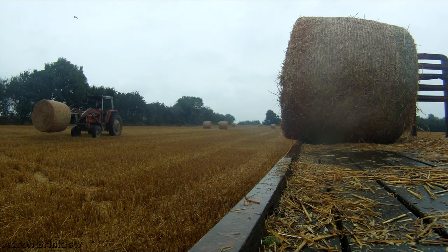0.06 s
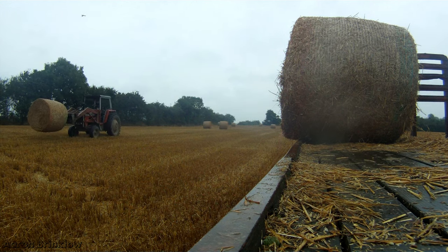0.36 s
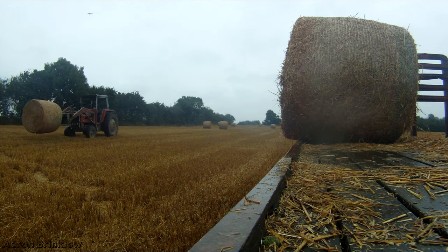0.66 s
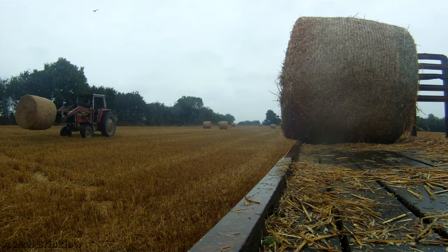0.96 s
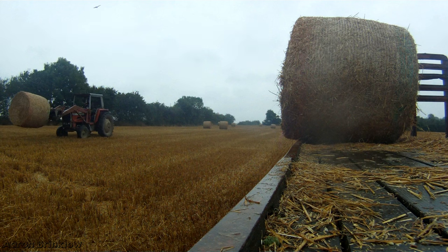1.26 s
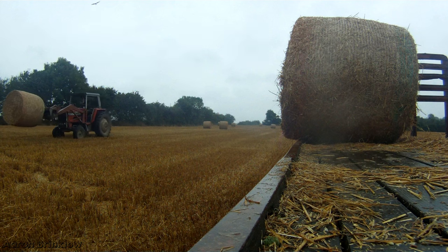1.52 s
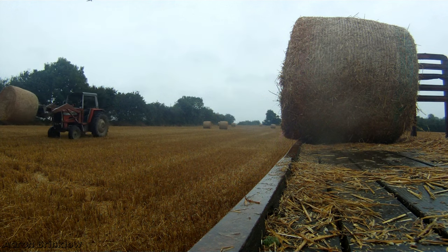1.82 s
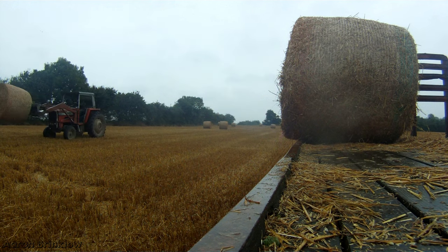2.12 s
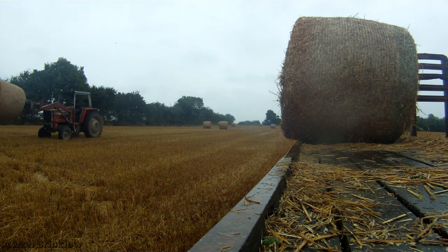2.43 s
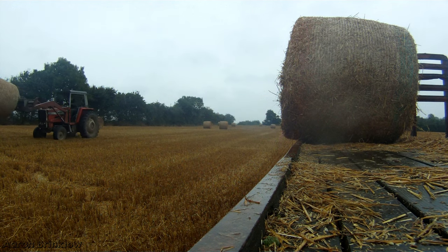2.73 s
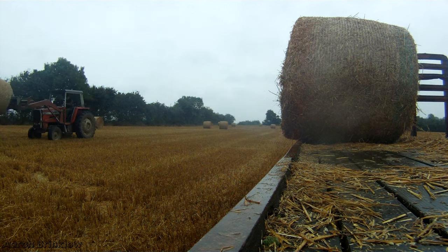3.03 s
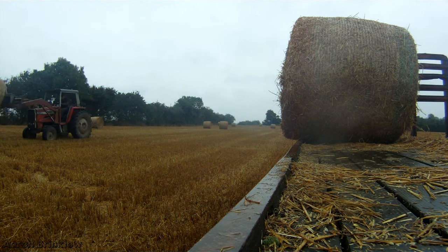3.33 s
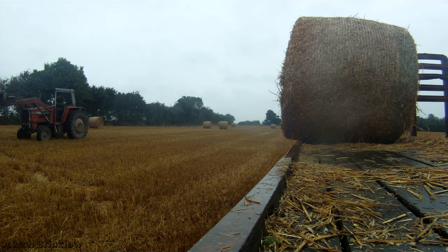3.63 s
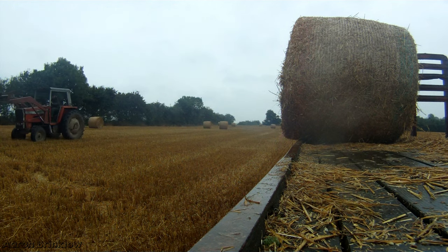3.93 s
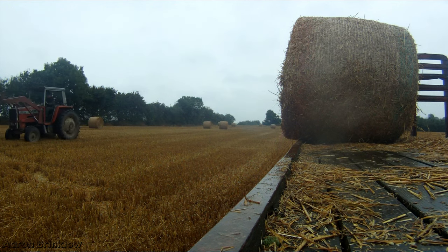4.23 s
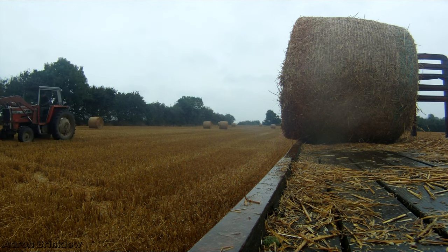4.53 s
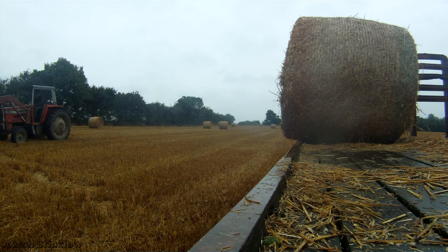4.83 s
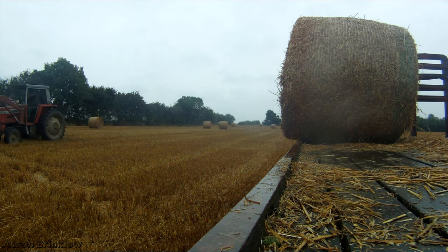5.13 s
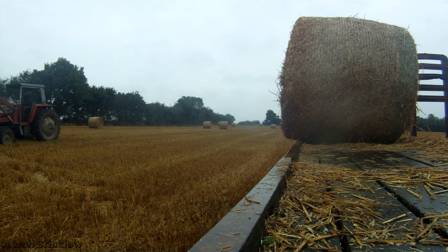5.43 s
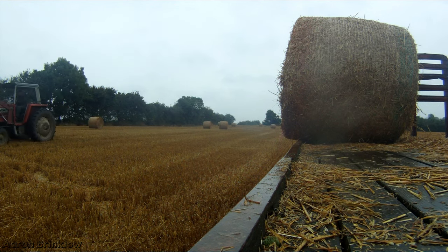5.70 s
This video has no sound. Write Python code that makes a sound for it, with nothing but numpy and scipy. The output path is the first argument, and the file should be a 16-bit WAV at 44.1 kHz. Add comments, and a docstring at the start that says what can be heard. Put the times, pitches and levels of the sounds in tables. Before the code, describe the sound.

A diesel tractor runs at low revs in an open field, slowly approaching a fixed microphone. Its exhaust thuds deeply and evenly under engine knock, valve rattle and a fan hum, with a thin sizzle on top. The revs sag briefly at the start, recover, then creep up in the second half. The bodywork clunks dully now and then, most clearly near the end, over a faint breeze.

```python
"""Tractor crossing a stubble field

A four-cylinder diesel carries a bale at low revs, slowly coming nearer through a light breeze.
The revs sag, recover and later creep up. Locked to the crankshaft, the exhaust thuds, the valve gear
rattles, the cylinders knock and the fan hums; now and then the bodywork clunks.
A small camera samples it all coarsely, mirroring the clatter into a thin treble sizzle."""
import sys
import numpy as np
from scipy import signal
from scipy.fft import rfft, irfft, next_fast_len
from scipy.io import wavfile
from scipy.ndimage import map_coordinates

SR = 44100
rng = np.random.default_rng(int(sys.argv[2]) if len(sys.argv) > 2 else 0)


def inscribe(sig):
    """Save sig as 16-bit PCM at rate SR to the path in sys.argv[1].

    A 1-D sig is mono; a 2-D sig holds one channel per row.
    Samples are clipped to [-1, 1] before scaling.
    """
    pcm = np.round(np.clip(np.atleast_2d(sig).T, -1, 1) * 32767)
    wavfile.write(sys.argv[1], SR, pcm.astype(np.int16))


N = 258426

# the four unequal cylinders, in firing order: puff_db, knock_db
CYLINDER_ACCENTS = [(-2, -1.5), (-6.5, 0), (-0.5, -1.5), (-3.5, -2.5)]
PUFF_DB, KNOCK_DB = np.transpose(CYLINDER_ACCENTS)
# broad ring of the block and panels: frequency_hz, level_db
PANEL_SPECTRUM = [(90, -25), (150, -1), (200, -4), (255, -6), (320, -1.5), (390, -2.5), (470, -2),
                  (670, -2), (780, -6.5), (860, -9.5), (1100, -19), (1600, -37)]
# broad ring of the cylinder head: frequency_hz, level_db
HEAD_SPECTRUM = [(1200, -23), (1750, -9.5), (2000, -4.5), (2250, -1), (2550, -5), (2980, -2), (3200, -12),
                 (3500, -19), (3850, -18.5), (4100, -26), (4900, -22.5), (5600, -25.5)]


def amp(db):
    """Decibels to gain."""
    return 10 ** (np.asarray(db) / 20)


def unit(x):
    """Scale to rms 1."""
    return x / np.sqrt(np.mean(x ** 2) + 1e-20)


def along(points, hz):
    """Read (frequency_hz, value) points on a log frequency axis."""
    corners_hz, values = np.transpose(points)
    return np.interp(np.log(hz + 1), np.log(corners_hz + 1), values)


def automation(points):
    """Join (time_s, value) points into one value per sample."""
    return np.interp(np.arange(N) / SR, *np.transpose(points))


def wobble(rate):
    """A smooth random curve, rate knots a second."""
    knots = rng.standard_normal(int(N * rate / SR) + 4)
    fine = np.arange(0, len(knots) - 1, 1 / 16)
    return np.interp(np.arange(N) * rate / SR, fine, map_coordinates(knots, [fine]))


def filtered(x, response):
    """Equalise x with a response given as a function of frequency."""
    size = next_fast_len(N + SR // 2)
    return irfft(rfft(x, size) * response(np.fft.rfftfreq(size, 1 / SR)), size)[..., :N]


def coloured(x, spectrum):
    """x through a spectrum that falls away steeply outside its ends, at rms 1."""
    low, high = spectrum[0][0], spectrum[-1][0]
    roll_off = lambda hz: np.minimum(hz / low, 1) ** 2 / np.maximum(hz / high, 1) ** 4
    return unit(filtered(x, lambda hz: amp(along(spectrum, hz)) * roll_off(hz)))


def bursts(crank, cylinder_db, lead, rise, fall, scatter_db):
    """A swell and decay per firing, sized by its cylinder; lead, rise and fall are in firing intervals."""
    count = int(crank[-1]) + 4
    size = amp(np.resize(cylinder_db, count) + scatter_db * rng.standard_normal(count))
    last, since = np.divmod(crank + lead, 1)
    last = last.astype(int)
    return size[last] * np.exp(-since / fall) + size[last + 1] * np.exp((since - 1) / rise)


def tone(crank, order, waver):
    """A partial at order times the firing rate; moving air makes it waver in level and phase."""
    angle = 2 * np.pi * order * crank
    flutter = wobble(5) * np.cos(angle) - wobble(5) * np.sin(angle)
    return unit(np.cos(angle) + waver * flutter)


def ringing(x):
    """Each resonance of the metalwork lifts its own band and rings on briefly."""
    # sharp resonances of the metalwork: centre_hz, width_hz, lift_db
    modes = [(308, 44, 2), (475, 42, 4.5), (596, 19, 4.5), (672, 33, 4.5), (780, 37, 2.5), (1096, 24, 3),
             (1271, 30, 5), (2178, 175, 4), (2830, 72, 3.5), (2960, 82, 3.5), (3750, 34, 8), (3910, 52, 3)]
    band = lambda hz, centre, width: 1j * hz * width / (centre ** 2 - hz ** 2 + 1j * hz * width)
    response = lambda hz: 1 + sum((amp(db) - 1) * band(hz, centre, width) for centre, width, db in modes)
    return unit(filtered(x, response))


def scattered(x, wet_db, t60):
    """Bonnet, loader and cab throw back a short, dense spray of reflections."""
    t = np.arange(SR // 8) / SR
    tail = rng.standard_normal(len(t)) * amp(-60 * t / t60)
    reflections = signal.fftconvolve(x, tail / np.linalg.norm(tail))[:N]
    return unit(x + amp(wet_db) * reflections)


def fader(closest_db, growth, throttle_db):
    """A layer's gain: up by growth dB per dB of nearness, and by throttle_db per unit of throttle."""
    # coast, a burst of fuel, then cruise: time_s, throttle (-1 shut, 0 cruising, 1 open)
    throttle = [(0, -1), (.41, -1.3), (.47, 0.82), (.7, 0.87), (.85, 0)]
    closest_m, speed_m_per_s, closest_s = 12.14, 2.17, 6.42  # a straight path, still nearing at the end
    distance_m = np.hypot(closest_m, speed_m_per_s * (np.arange(N) / SR - closest_s))
    nearness_db = 20 * np.log10(closest_m / distance_m)
    drift_db = 0.3 * wobble(5.04)  # moving air
    return amp(closest_db + growth * nearness_db + throttle_db * automation(throttle) + drift_db)


def struck(hits, spectrum, t60, attack_s=0.0019):
    """A short noise burst for each (start_s, level_db) hit rings one part of the tractor."""
    t = np.arange(SR // 4) / SR
    envelope = np.zeros(N + SR)
    for start_s, db in hits:
        envelope[round(start_s * SR):][:len(t)] += amp(db - 60 * t / t60) * (1 - np.exp(-t / attack_s))
    blows = envelope[:N] * rng.standard_normal(N)
    return np.std(blows) * ringing(coloured(blows, spectrum))


def breeze():
    """Air moving over the field: a steady bed of low rumble and faint hiss."""
    # colour of the breeze: frequency_hz, level_db
    air_spectrum = [(15, -15), (40, -4.5), (120, 1), (300, -14), (1000, -22), (3000, -21), (6000, -32.5)]
    return coloured(rng.standard_normal(N), air_spectrum)


def bodywork_clunks():
    """The panels clunk dully as the tractor jolts along."""
    # jolts to the bodywork: start_s, level_db
    jolts = [(.543, -39.5), (.963, -40), (2.953, -38), (4.901, -35), (4.978, -34), (5.203, -29.5),
             (5.317, -44), (5.832, -33)]
    return struck(jolts, PANEL_SPECTRUM, t60=0.11)


def hard_knocks():
    """A few ignitions hit the cylinder head harder than the rest."""
    # hard ignitions: start_s, level_db
    ignitions = [(1.241, -42), (2.66, -43), (2.879, -41), (3.18, -35), (3.206, -39), (3.532, -38)]
    return struck(ignitions, HEAD_SPECTRUM, t60=0.061)


def fan_and_gears(crank):
    """Fan blades and timing gears hum at pitches that follow the revs."""
    # fan and gear partials: multiple of the firing rate, level_db
    whines = [(4.165, -11.5), (8.33, -11.5), (9.5, -17.5)]
    return sum(amp(db) * tone(crank + rng.random(), order, waver=0.4) for order, db in whines)


def churn(crank, steady=1.9):
    """Rushing gas and fan air, surging a little with each firing and ringing the panels."""
    surge = steady + bursts(crank, KNOCK_DB, lead=-0.03, rise=0.12, fall=0.53, scatter_db=3.5)
    return ringing(coloured(surge * rng.standard_normal(N), PANEL_SPECTRUM))


def valve_clack(crank, steady=0.58):
    """The valve gear clacks under the rocker cover, a moment after each ignition."""
    # broad ring of the rocker cover: frequency_hz, level_db
    cover_spectrum = [(700, -10.5), (950, -0.5), (1180, -4), (1430, -0.5), (1680, -9), (2000, -18)]
    envelope = steady + bursts(crank, KNOCK_DB, lead=-0.05, rise=0.29, fall=0.22, scatter_db=1.4)
    clacks = scattered(envelope * rng.standard_normal(N), wet_db=-11, t60=0.09)
    return ringing(coloured(clacks, cover_spectrum))


def diesel_knock(crank, steady=0.24, grit_db=1.0):
    """Each ignition sets off a gritty burst that rings in the cylinder head."""
    envelope = steady + bursts(crank, KNOCK_DB, lead=-0.0089, rise=0.26, fall=0.34, scatter_db=0.92)
    grit = envelope * amp(grit_db * wobble(500)) * rng.standard_normal(N)
    return ringing(coloured(scattered(grit, wet_db=-9, t60=0.11), HEAD_SPECTRUM))


def rattle(crank, count=48, jitter_s=0.00012, scatter_db=2.0):
    """Valves, injectors and pistons tap at the same shaft angles in every cycle and ring the panels."""
    cycle = len(CYLINDER_ACCENTS)  # firings
    angles = (np.arange(count) + rng.random(count)) * cycle / count
    pattern = rng.choice([-1, 1], count) * amp(4 * rng.standard_normal(count))
    cycle_starts = np.arange(0, crank[-1], cycle)
    timing, force = rng.standard_normal((len(cycle_starts), 2, count)).swapaxes(0, 1)
    onsets = np.interp(cycle_starts[:, None] + angles, crank, np.arange(N), left=-SR, right=2 * N)
    onsets += jitter_s * SR * timing
    sizes = pattern * amp(scatter_db * force)
    inside = (onsets >= 0) & (onsets < N)
    taps = np.bincount(onsets[inside].astype(int), sizes[inside], N)
    return ringing(coloured(taps, PANEL_SPECTRUM))


def exhaust_drone(crank, firing_hz, db_per_hz=0.9):
    """The exhaust's overtones, each at its own phase, grow louder as the revs rise."""
    # upper exhaust partials: multiple of the firing rate, level_db
    overtones = [(9, -15), (10, -19.5), (12, -14), (13, -21), (14, -18), (15, -14.5), (16, -16), (18, -16),
                 (20, -15.5), (28, -26.5)]
    drone = sum(amp(db) * tone(crank + rng.random(), order, waver=0.4) for order, db in overtones)
    return amp(db_per_hz * (firing_hz - firing_hz.mean())) * drone


def exhaust_puffs(crank):
    """Each cylinder sends a sharp pressure pulse and a softer puff of gas up the stack."""
    pulse = bursts(crank, PUFF_DB, lead=0, rise=0.03, fall=0.038, scatter_db=-0.5)
    pulse = coloured(pulse, [(170, -16), (220, 1.5), (290, 0.5), (400, -5), (600, -20)])
    flow = bursts(crank, PUFF_DB, lead=0.026, rise=0.19, fall=0.21, scatter_db=-0.5)
    gas = flow * rng.standard_normal(N)
    gas = coloured(gas, [(45, 0), (90, -4.5), (160, -0.5), (260, -4), (360, -15)])
    return amp(-5.5) * pulse + amp(-2) * gas


def silencer_gains(firing_hz):
    """The five lowest exhaust orders swell and fade as the revs slide them along the silencer's curve."""
    # the silencer's response at the closest point: pitch_hz, level_db
    response = [(33.5, -37.7), (40, -32.5), (67, -35), (75, -33.5), (80, -36), (104, -34.3), (110, -37.5),
                (118, -39.5), (135, -56), (158, -46.5), (183, -48.5), (198, -52)]
    # how orders one to five grow: growth (dB per dB of nearness), throttle_db
    order_growth = [(0.4, 0.3), (1.0, 0.5), (.7, 2), (2.6, 5), (0.14, 2.5)]
    return [fader(along(response, order * firing_hz), growth, throttle_db)
            for order, (growth, throttle_db) in enumerate(order_growth, 1)]


def stack_ring(crank, fourth, fifth):
    """The exhaust stack rings on the fourth and fifth orders."""
    return fourth * tone(crank, order=4, waver=0.27) + fifth * tone(crank, order=5, waver=0.26)


def exhaust_thud(crank, first, second, third, lag=0.2, second_lag=0.25):
    """Three low orders make one deep swing after each firing; the silencer delays the second a little."""
    # unequal cylinders add a lope between the orders: multiple of the firing rate, level_db
    lope_partials = [(1.25, -25), (2.251, -22.5), (2.75, -26.5), (3.25, -25)]
    swing = (first * tone(crank - lag, order=1, waver=0.03)
             + second * tone(crank - second_lag, order=2, waver=0.04)
             + third * tone(crank - lag, order=3, waver=0.097))
    lope = first * sum(amp(db) * tone(crank, order, waver=0.45) for order, db in lope_partials)
    return lope - swing


def scene():
    """The crankshaft drives the engine's layers; the tractor is far enough away to be one point."""
    # engine speed: time_s, firing_hz
    revs = [(0.0, 38.83), (0.51, 33.46), (0.79, 36.22), (1.36, 36.83), (1.58, 36.16), (1.91, 36.93),
            (3.26, 36.5), (3.47, 37.07), (3.96, 36.77), (4.14, 38.0), (4.43, 37.78), (4.79, 39.1),
            (5.0, 38.65), (5.56, 40.21), (5.86, 38.74)]
    # the bass leans right: frequency_hz, left_minus_right_db
    lean = [(60, -.9), (150, -.8), (400, -.4), (1200, 0)]
    firing_hz = automation(revs)
    crank = 0.25 + np.cumsum(firing_hz) / SR  # shaft position, counted in firings
    first, second, third, fourth, fifth = silencer_gains(firing_hz)
    stack = stack_ring(crank, fourth, fifth)
    puffs = amp(-9) * exhaust_puffs(crank)
    panels = amp(-5) * (rattle(crank) + churn(crank))
    hum = amp(-0.55) * (exhaust_drone(crank, firing_hz) + fan_and_gears(crank))
    valves = fader(closest_db=-49.5, growth=0.23, throttle_db=0.75) * valve_clack(crank)
    knock = fader(closest_db=-43, growth=1.34, throttle_db=0.1) * diesel_knock(crank)
    hits = amp(1.5) * bodywork_clunks() + amp(0.5) * hard_knocks()
    thud = exhaust_thud(crank, first, second, third)
    body = fader(closest_db=-38, growth=1.0, throttle_db=0.96) * (panels + puffs + hum)
    mix = amp(-50) * breeze() + hits + valves + knock + body + stack + thud
    return filtered(mix, lambda hz: amp(np.outer([0.5, -0.5], along(lean, hz))))


def record(dry, camera_hz=12000, top_hz=15280):
    """The camera samples slowly and holds each value for four steps, mirroring sound into the treble."""
    coarse = signal.resample_poly(dry, camera_hz, SR, axis=1)
    steps = np.repeat(coarse, 4, axis=1)
    held = signal.resample_poly(steps, SR, 4 * camera_hz, axis=1)[:, :N]
    return filtered(held, lambda hz: hz < top_hz)


dry = scene()
out = record(dry)
inscribe(out)
```